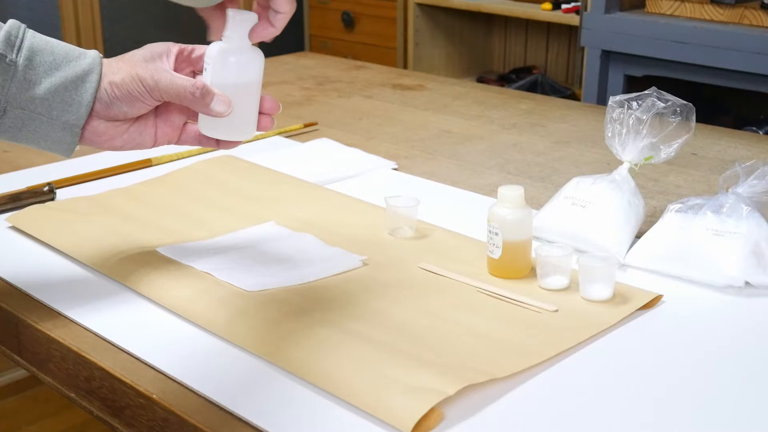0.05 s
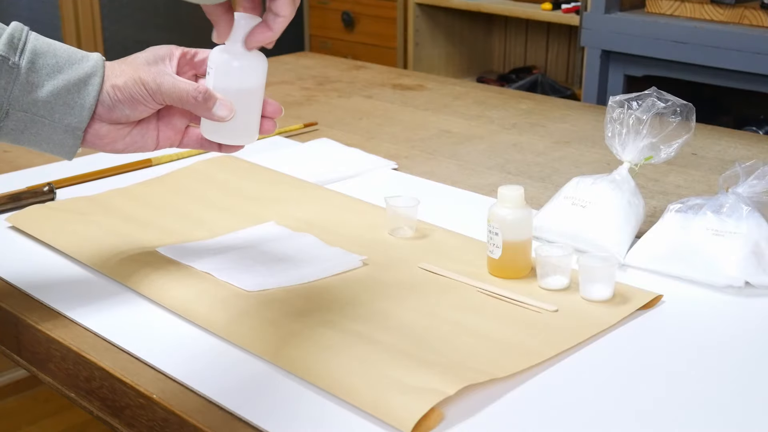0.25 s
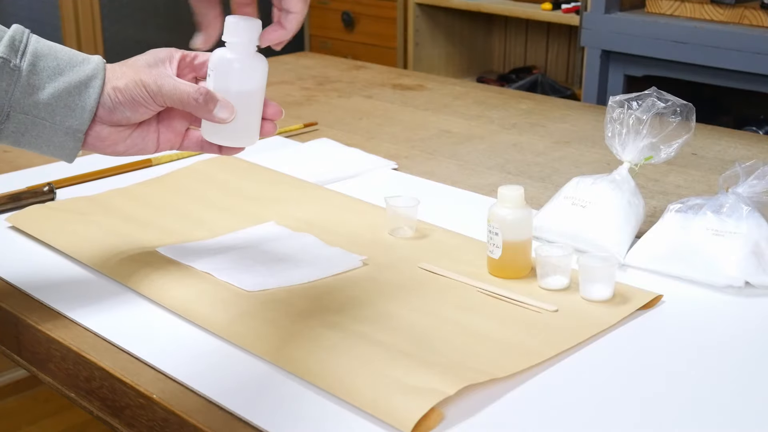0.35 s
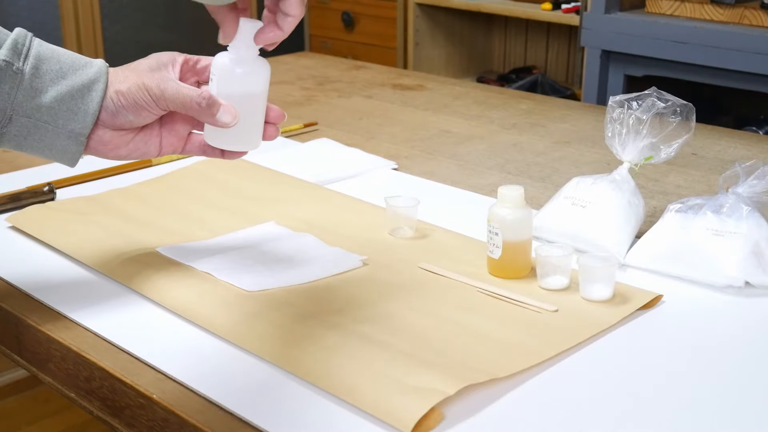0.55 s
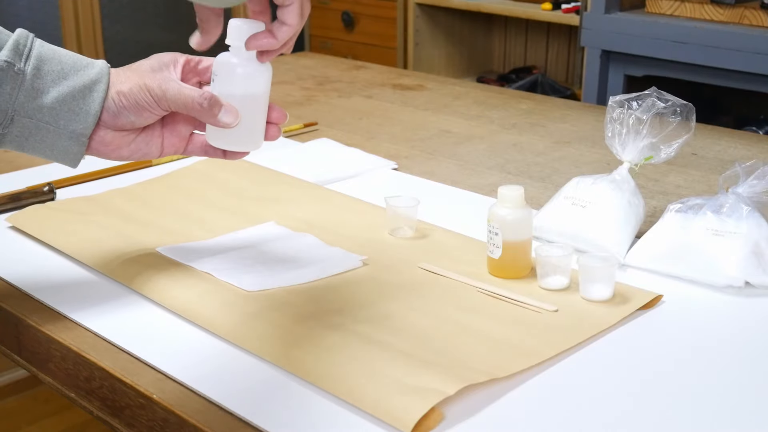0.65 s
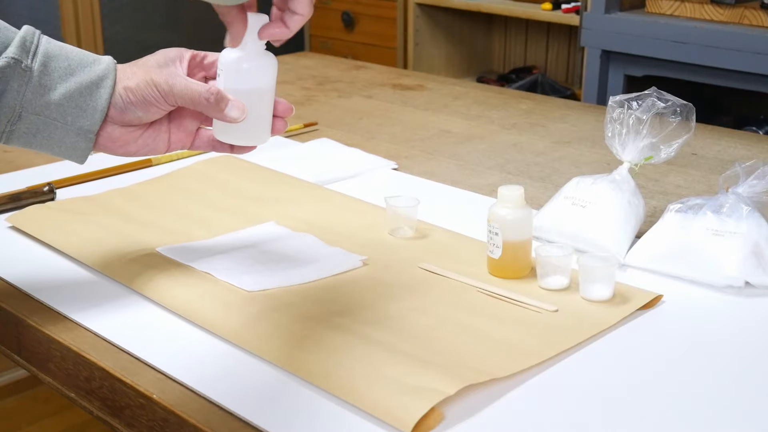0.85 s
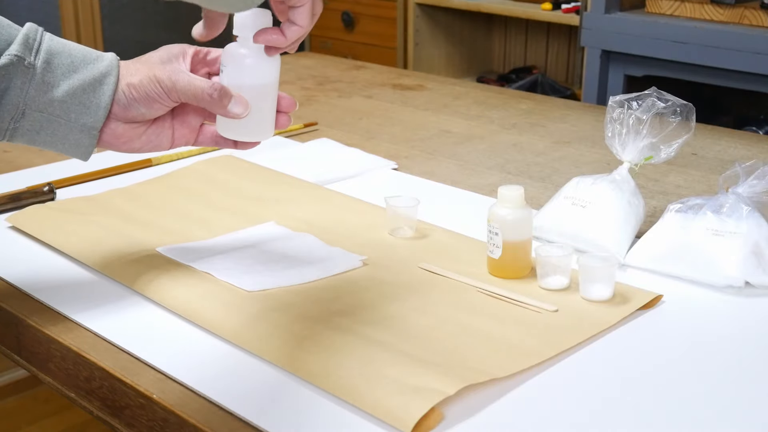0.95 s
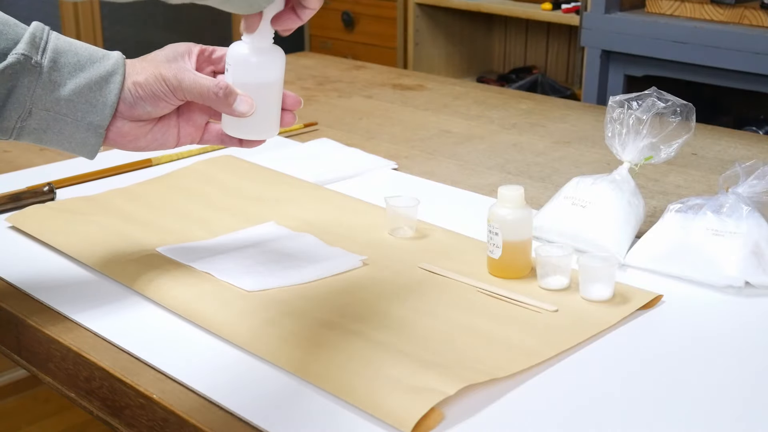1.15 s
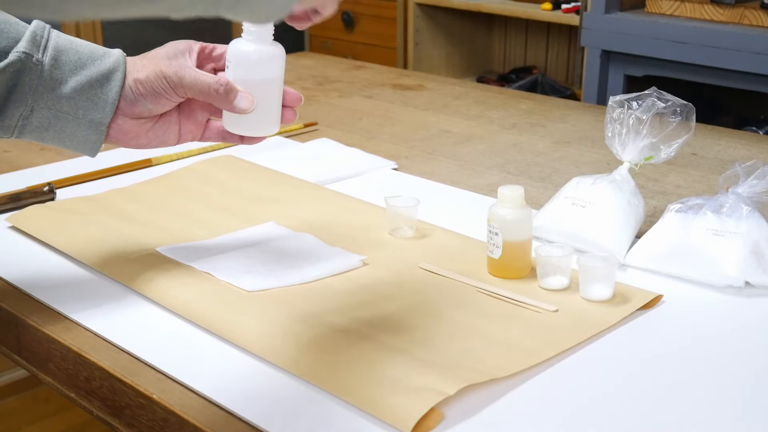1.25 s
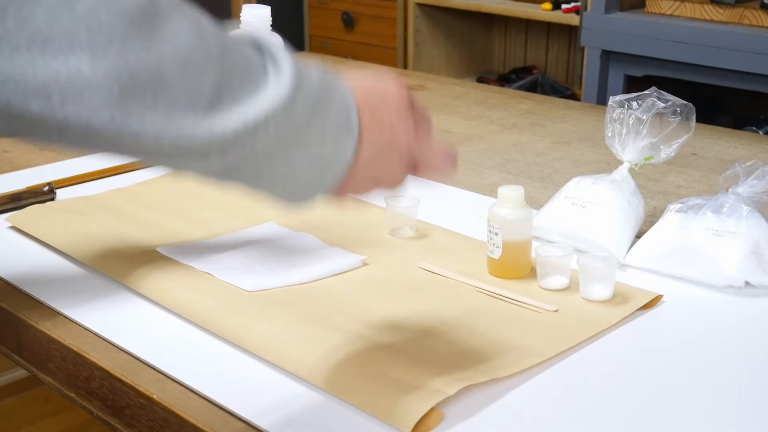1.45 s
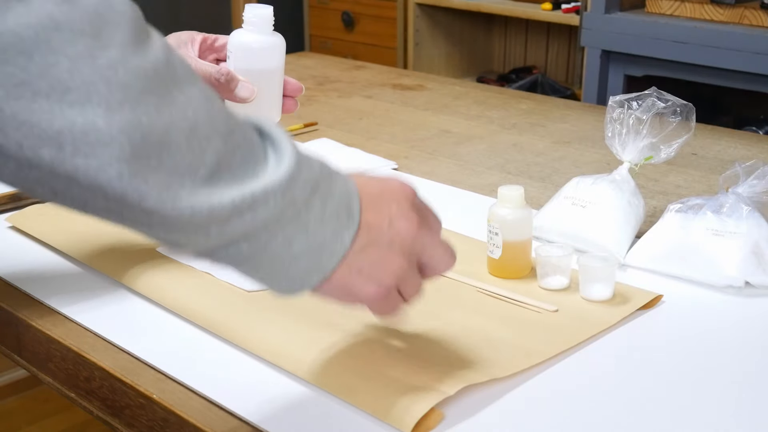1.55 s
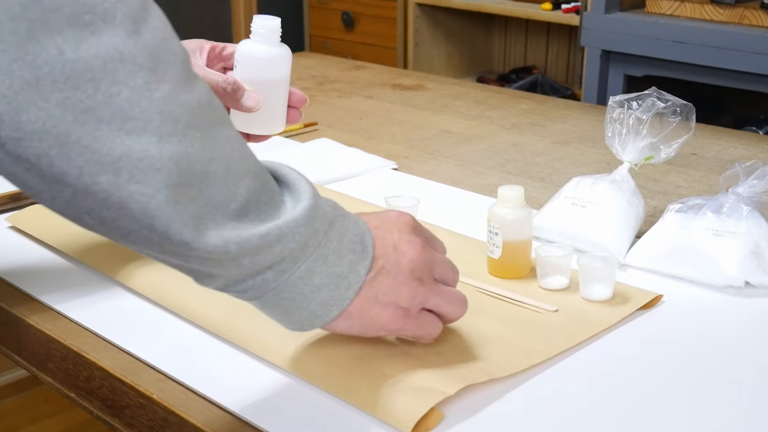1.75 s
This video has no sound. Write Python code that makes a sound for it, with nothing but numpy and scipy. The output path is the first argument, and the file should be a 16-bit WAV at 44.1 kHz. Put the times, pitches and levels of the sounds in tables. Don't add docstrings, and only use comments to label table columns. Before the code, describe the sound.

Sharp cracks of a small plastic bottle cap letting go, first soft, then two loud bursts, dwindling to tiny ticks and a faint sleeve rustle. Short room echo, low rumble; sound on the right, hiss on the left.

```python
import sys
import numpy as np
from scipy import signal
from scipy.fft import rfft, irfft, next_fast_len
from scipy.io import wavfile
from scipy.ndimage import map_coordinates

SR = 44100
rng = np.random.default_rng(int(sys.argv[2]) if len(sys.argv) > 2 else 0)


def persist_wave(psi):
    counts = np.round(np.clip(psi, -1, 1) * 32767).astype(np.int16)
    wavfile.write(sys.argv[1], SR, np.atleast_2d(counts).T)


def invert_db(x):
    u = np.asarray(x, float) / 20
    return 10 ** u


N = 79380


def along(points, hz):
    f, value = np.transpose(points)
    return np.interp(np.log(hz + 1), np.log(f + 1), value)


def curve(rows):
    return np.interp(np.arange(N) / SR, *np.transpose(rows))


def wobble(rate):
    knots = rng.standard_normal(int(N * rate / SR) + 4)
    return map_coordinates(knots, [np.arange(N) * rate / SR])


def filtered(x, response):
    m = next_fast_len(len(x) + SR // 4)
    spectrum = rfft(x, m) * response(np.fft.rfftfreq(m, 1 / SR))
    return irfft(spectrum, m)[:len(x)]


def noise(spectrum):
    return filtered(rng.standard_normal(N), lambda hz: invert_db(along(spectrum, hz)))


def unit(x):
    return x / np.sqrt(np.mean(x ** 2) + 1e-20)


def preamp_hiss():
    # f/Hz, level/dB
    hiss_colour = [(40, -60), (300, -58.5), (600, -66), (900, -72), (1500, -62.5), (4300, -57.5),
                   (10000, -56.5), (14800, -58), (15800, -63)]
    return noise(hiss_colour)


def traffic():
    # t/s, level/dB
    swells = [(0.0, -56.5), (0.284, -60.5), (0.3, -55), (0.546, -60.5), (0.796, -55), (0.896, -63),
              (0.922, -57), (1.042, -62.5), (1.118, -54.5), (1.142, -67), (1.222, -51), (1.412, -52.5),
              (1.432, -47.5), (1.498, -53.5), (1.614, -53.5), (1.684, -61.5), (1.724, -54), (1.8, -54)]
    # f/Hz, level/dB
    rumble_colour = [(40, -26), (70, -2.5), (115, 0.5), (200, -6.5), (280, -15.5), (450, -40)]
    gain_db, wobble_db = 5.5, 1
    level_db = curve(swells) + gain_db + wobble_db * wobble(8.93)
    return invert_db(level_db) * unit(noise(rumble_colour))


def fan():
    # f/Hz, width/Hz, level/dB
    fan_tones = [
        (300.5, 3.7, -63),
        (117.7, 9.4, -63),
    ]
    hum = np.zeros(N)
    for hz, width, db in fan_tones:
        tone = filtered(rng.standard_normal(N), lambda f: np.exp(-((f - hz) / width) ** 2))
        hum += invert_db(db) * unit(tone)
    return hum


def background():
    # f/Hz, level/dB
    drone_colour = [(20, -28.5), (45, -25), (80, -34.5), (200, -39.5), (350, -39), (600, -49.5), (900, -63)]
    # f/Hz, level/dB
    air_colour = [(200, -41), (600, -49), (900, -56), (1500, -51), (2600, -50.5), (4300, -52),
                  (6500, -52.5), (11000, -56.5)]
    return traffic() + noise(drone_colour) + noise(air_colour) + fan()


def band(f):
    low, high = 1j * f / 1060, 1j * f / 8700
    low_cut = -low ** 3 / (1 + low + low ** 2) / (1 + low)
    high_cut = 1 / (1 + 1.12 * high + high ** 2) ** 3
    skirt = invert_db(-20) * 3 * low / (1 + 3 * low)
    return low_cut * high_cut + skirt


def snap(hz, width, ring_db, late_s):
    crack_db = -11.5
    crack_span = 1.62
    soft = 3.8
    f = np.fft.rfftfreq(2048, 1 / SR)

    def mode(w):
        return 1j * f * w / (hz * hz - f * f + 1j * f * w)

    ring = invert_db(ring_db) * mode(width) * mode(soft * width) * np.sqrt(1000 / width)
    crack = invert_db(crack_db) * band(f) / (1 + 1j * f / (crack_span * hz)) ** 2
    return irfft((crack + ring) * np.exp(-2j * np.pi * f * late_s))


def tail():
    # f/Hz, time to fall 60 dB/s
    decay_times = [(800, 0.26), (1200, 0.45), (2200, .26), (5600, 0.21), (8500, .23), (12000, .16)]
    rise_s = 0.0037
    hz, t, z = signal.stft(rng.standard_normal(SR // 3), SR, nperseg=128)
    decay = invert_db(-60 * t / along(decay_times, hz)[:, None])
    x = signal.istft(z * decay, SR, nperseg=128)[1]
    x = x * (1 - np.exp(-(np.arange(len(x)) / SR / rise_s) ** 2))
    return x / np.linalg.norm(x)


def wall_echoes(direct):
    # delay/s, level/dB, dull above f/Hz
    reflections = [
        (.0041, -17, 5950),
        (.0078, -17, 14000),
        (.0092, -15.5, 11000),
        (.0104, -15, 4000),
        (.0144, -21, 9000),
        (0.0217, -20, 5050),
    ]

    def response(f):
        return sum(invert_db(db) * np.exp(-2j * np.pi * f * s) / (1 + 1j * f / hz) ** 2 for s, db, hz in reflections)

    return filtered(direct, response)


def cap():
    # t/s, level/dB, ringing
    # pitch f/Hz, ring width/Hz
    snaps_and_ticks = [(.2200, -28, 2600, 370), (.2212, -27.5, 1030, 260), (0.22, -26, 3800, 400),
                       (.2216, -22, 2590, 380), (0.22, -30, 6000, 450), (.2214, -31, 610, 400),
                       (0.27, -30, 4800, 420), (.2214, -31, 1800, 450), (.3460, -20, 5010, 420),
                       (0.34, -23, 3170, 400), (.3463, -22.5, 1620, 240), (.3462, -24.5, 2350, 390),
                       (.3465, -22.5, 4380, 330), (0.34, -32, 7100, 500), (.3463, -32.5, 540, 400),
                       (.4683, -9, 5420, 450), (.4683, -14.5, 7270, 310), (.4685, -14.5, 6370, 400),
                       (.4692, -7.5, 4300, 320), (0.47, -9, 2380, 250), (0.56, -33, 13500, 600),
                       (.4686, -35, 11800, 900), (0.47, -11.5, 2900, 300), (.4703, -12, 3400, 270),
                       (0.47, -12, 4900, 470), (0.47, -15, 1750, 320), (0.47, -23, 8000, 400),
                       (.4700, -27, 1110, 240), (0.73, -20.5, 2500, 800), (0.74, -24, 4200, 800),
                       (0.7, -26, 1600, 400), (.7326, -10.5, 4330, 370), (.7333, -10, 5250, 880),
                       (.73368, -10, 5280, 470), (.7336, -14.5, 6600, 460), (.73368, -7, 2670, 550),
                       (.7337, -9.5, 1730, 260), (.7342, -16, 8000, 320), (.7335, -31, 12600, 1000),
                       (.7334, -36, 14100, 300), (.7335, -27, 10900, 500), (.7336, -25, 9300, 360),
                       (.7344, -16.5, 4750, 360), (.7354, -21, 5300, 500), (.7339, -17, 3520, 310),
                       (.7338, -22.5, 1186, 240), (.7336, -31, 540, 400),
                       (0.00202, -33, 2450, 400), (.020, -34, 2500, 150), (.2285, -29, 1240, 76),
                   (.2380, -32, 1170, 120), (.2450, -35, 3700, 300), (0.27, -34, 2530, 150),
                   (.4788, -21, 2400, 130), (.4975, -22.5, 1800, 120), (.5110, -26, 1900, 150),
                   (.5575, -23.5, 2600, 700), (.5579, -28.5, 2200, 350), (.5577, -30, 4980, 800),
                   (.7428, -25, 1520, 230), (.7425, -27, 6400, 500), (.7525, -27, 1270, 130),
                   (.8366, -24.5, 2170, 820), (1.0204, -26.5, 5100, 300), (1.0210, -27, 5450, 200),
                   (1.0208, -33, 7200, 600), (0.87, -32, 17000, 700), (1.1, -34, 9900, 400),
                   (0.95, -34, 8100, 400), (1.0209, -35, 2500, 1300), (1.0207, -39, 3800, 400),
                   (1.0265, -33, 4800, 300), (1.1, -31, 5200, 500), (1.0400, -37, 5500, 300),
                   (1.0580, -37, 1700, 250), (1.6870, -30, 6100, 2500), (1.6895, -39, 2300, 900),
                   (1.7522, -32, 6500, 2500), (1.7520, -36, 1300, 990), (1.7525, -40, 14000, 900)]
    snap_db, ring_db = 6.5, 9.5
    room_db, room_ring_db = -8.5, -1.5
    room_blur = 2.76
    near, far = np.zeros(N + SR), np.zeros(N + SR)
    for s, db, hz, width in snaps_and_ticks:
        start, gain = int(s * SR), invert_db(db + snap_db)
        direct = snap(hz, width, ring_db, s - start / SR)
        off_axis = snap(hz, room_blur * width, ring_db + room_ring_db, 0)
        spread = signal.fftconvolve(off_axis, tail())
        near[start:start + len(direct)] += gain * direct
        far[start:start + len(spread)] += gain * spread
    return (near + wall_echoes(near) + invert_db(room_db) * far)[:N]


def sleeve():
    # t/s, level/dB
    rustle = [
        (1.25, -80),
        (1.45, -70),
        (1.66, -66),
        (1.72, -62),
        (1.76, -58),
        (1.8, -63),
    ]
    # f/Hz, level/dB
    cloth_colour = [(700, -30), (1400, 0), (4000, 0.1), (8000, -1), (15000, -12)]
    return invert_db(curve(rustle) + 3.4 * wobble(120)) * unit(noise(cloth_colour))


def scene():
    right = cap() + background() + sleeve()
    return np.array([np.zeros(N), right])


def low_pass(x):
    return signal.sosfilt(signal.butter(12, 16420, fs=SR, output="sos"), x)


def record(dry):
    # t/s, gain/dB
    gain_ride = [
        (0, 0),
        (.4, .5),
        (.82, 0),
        (.88, -1.05),
        (1.65, -0.73),
        (1.8, 0.8),
    ]
    top_hz = 15810
    x = (dry + np.array([preamp_hiss(), preamp_hiss()])) * invert_db(curve(gain_ride))
    mix = np.array([filtered(channel, lambda hz: hz < top_hz) for channel in x])
    return low_pass(mix)


dry = scene()
out = record(dry)
persist_wave(out)
```